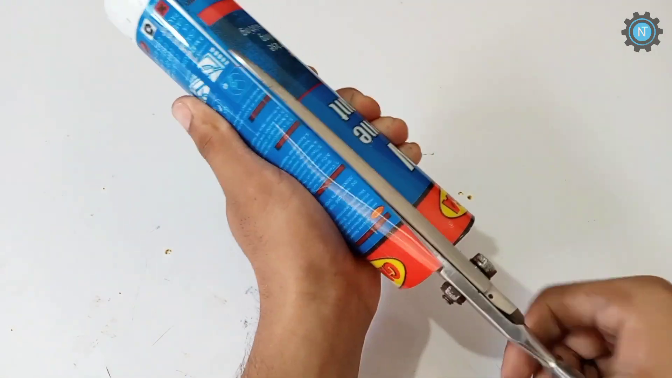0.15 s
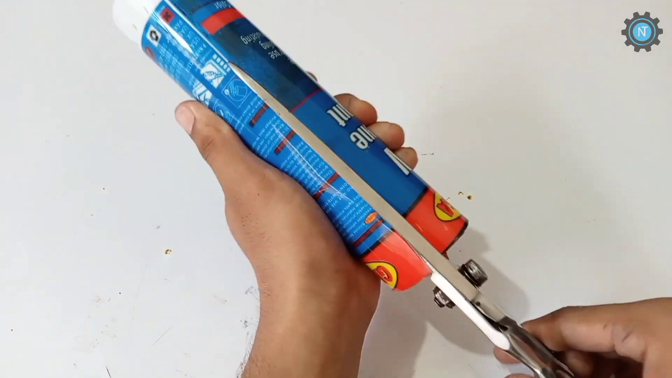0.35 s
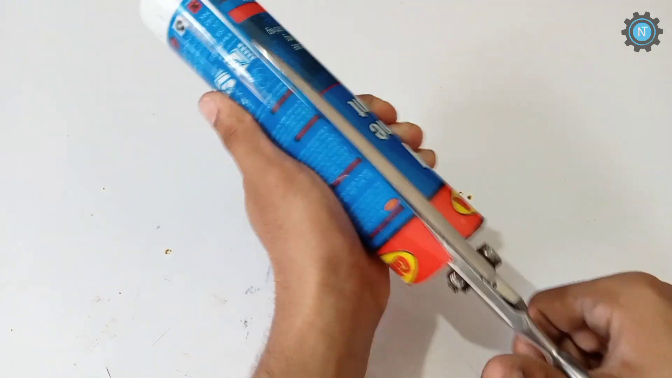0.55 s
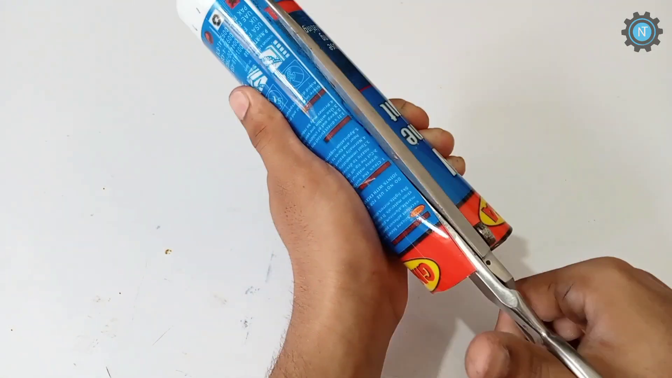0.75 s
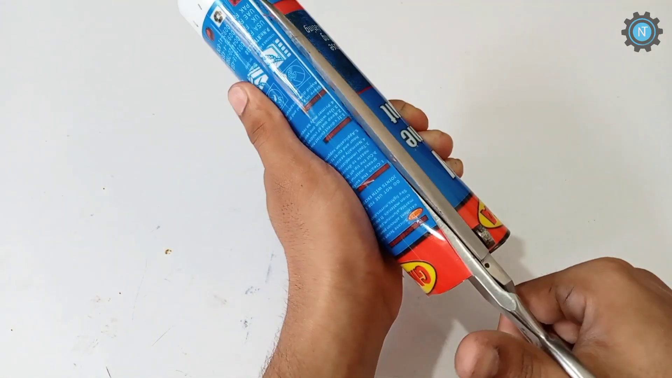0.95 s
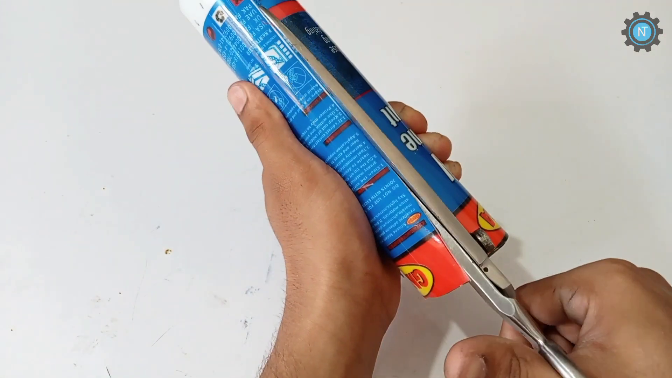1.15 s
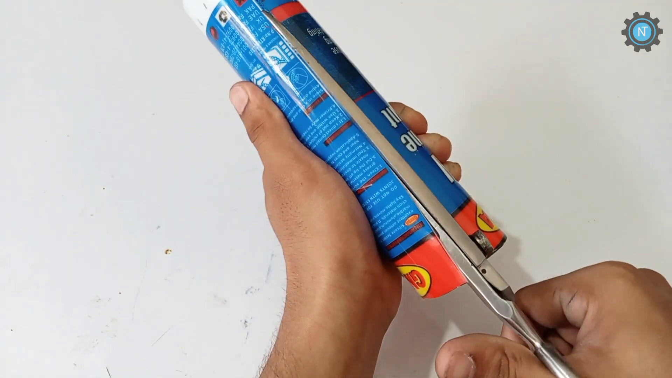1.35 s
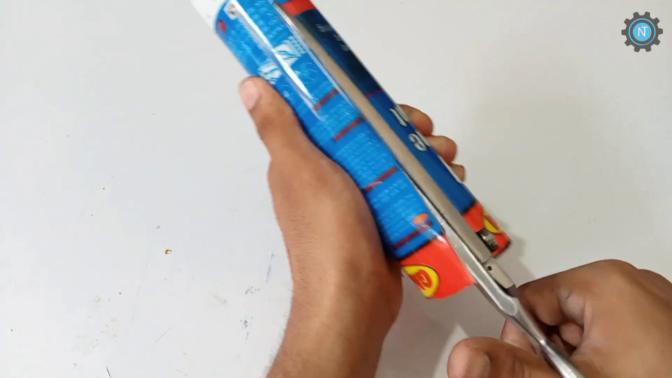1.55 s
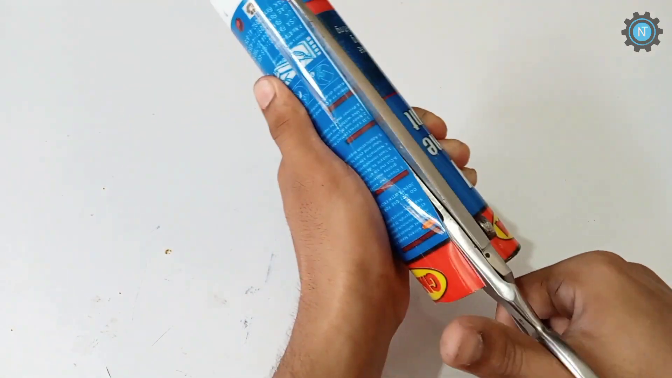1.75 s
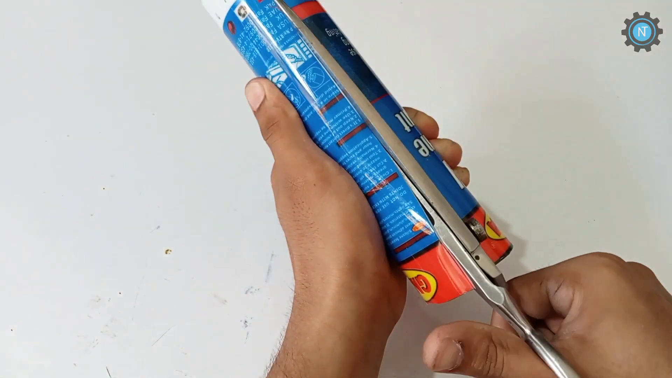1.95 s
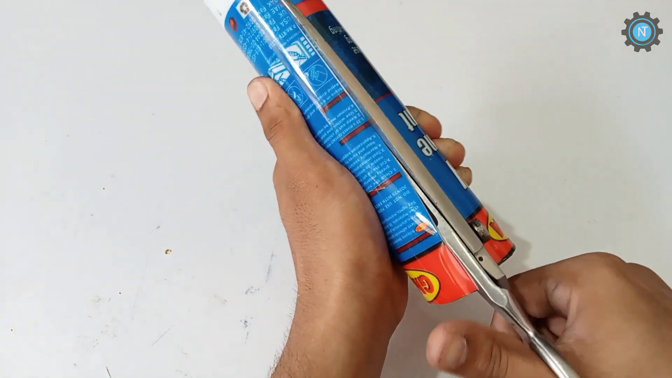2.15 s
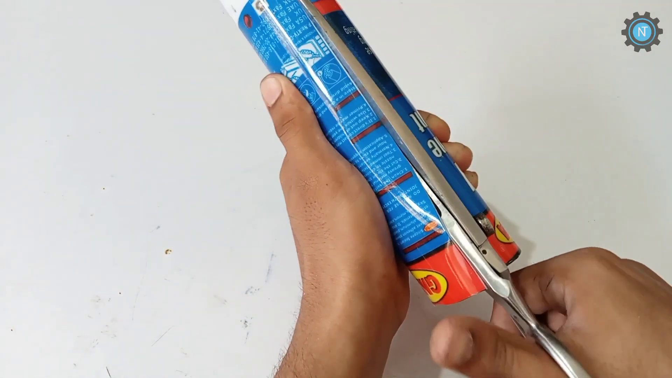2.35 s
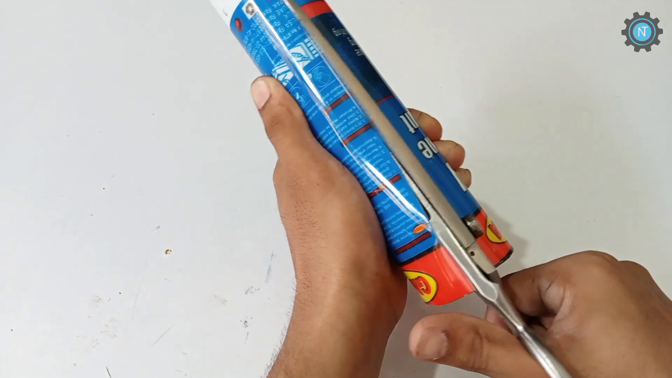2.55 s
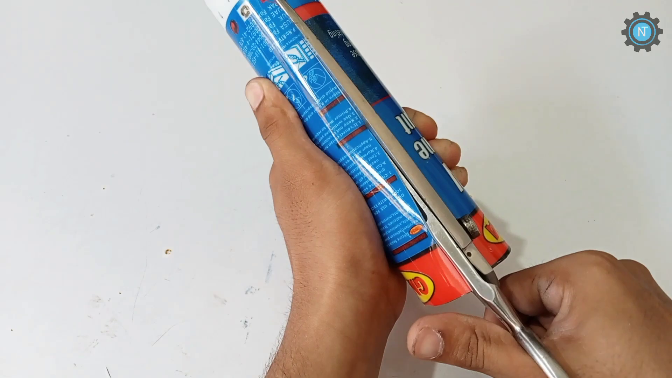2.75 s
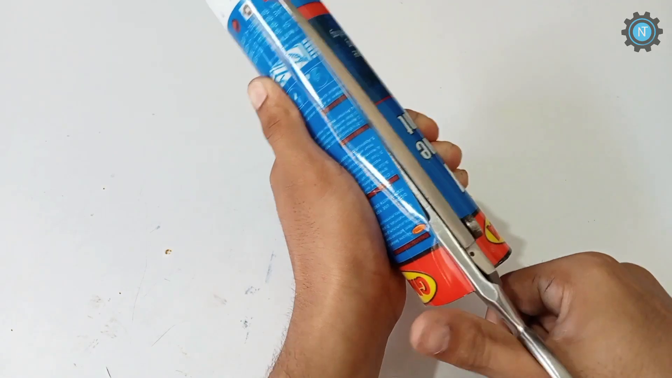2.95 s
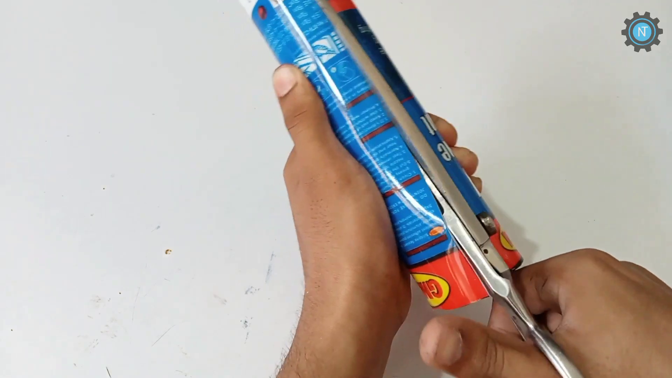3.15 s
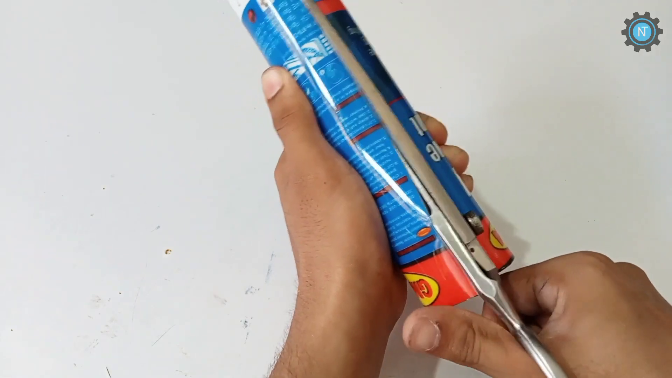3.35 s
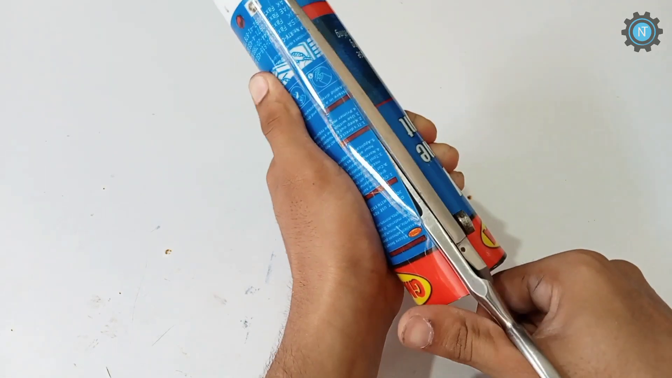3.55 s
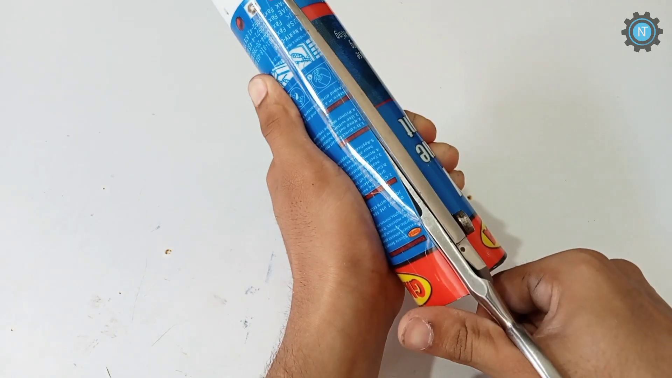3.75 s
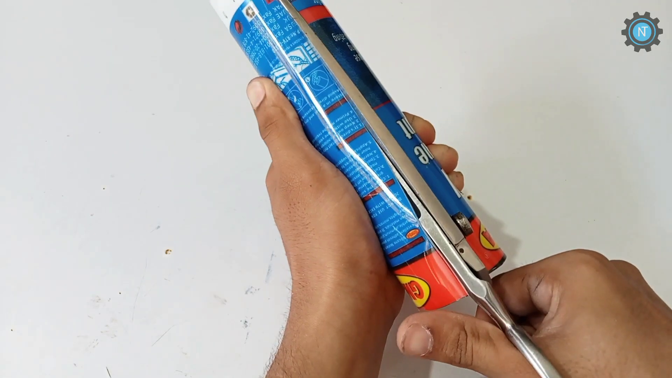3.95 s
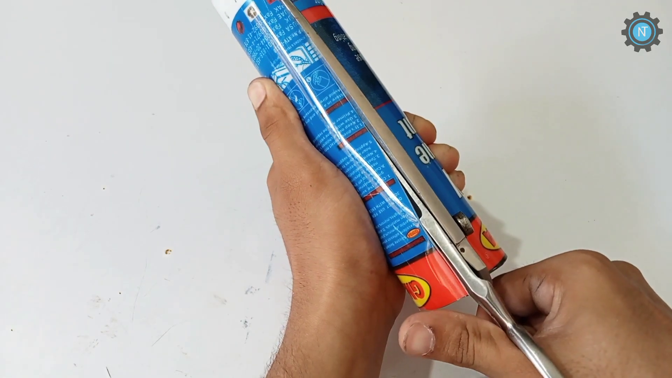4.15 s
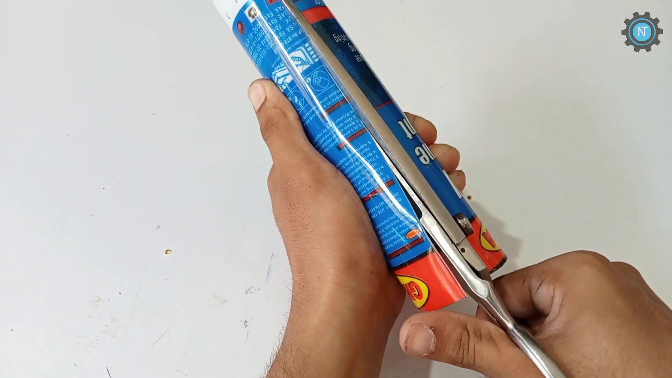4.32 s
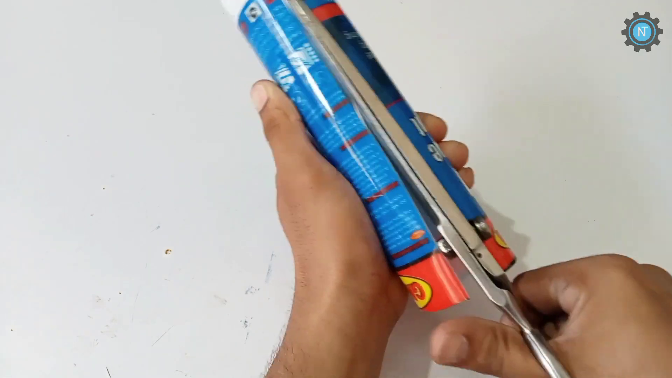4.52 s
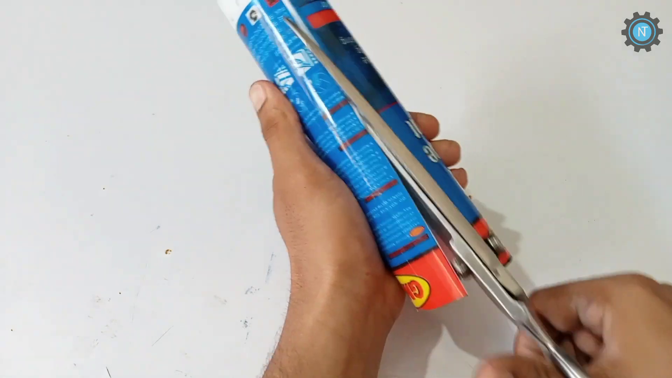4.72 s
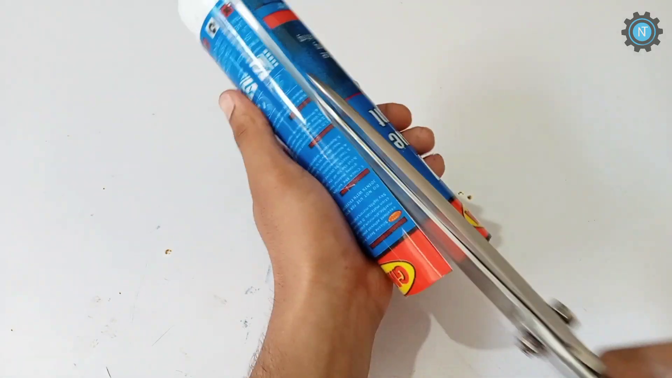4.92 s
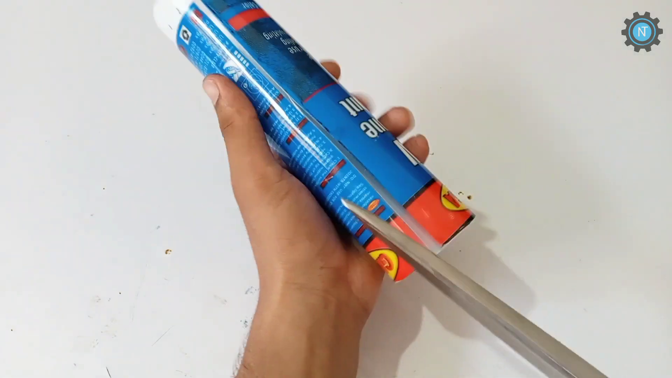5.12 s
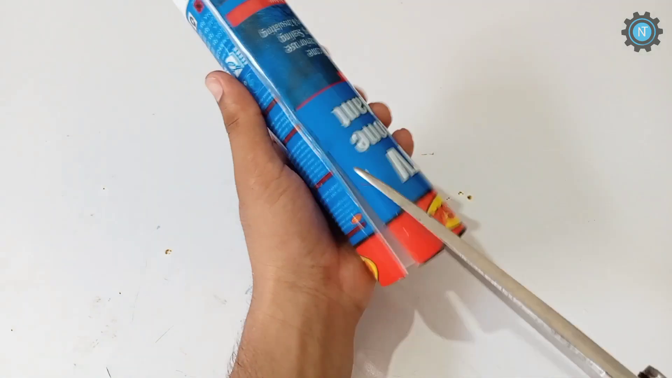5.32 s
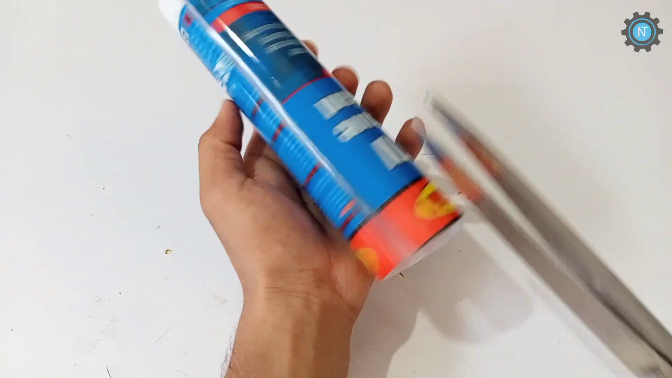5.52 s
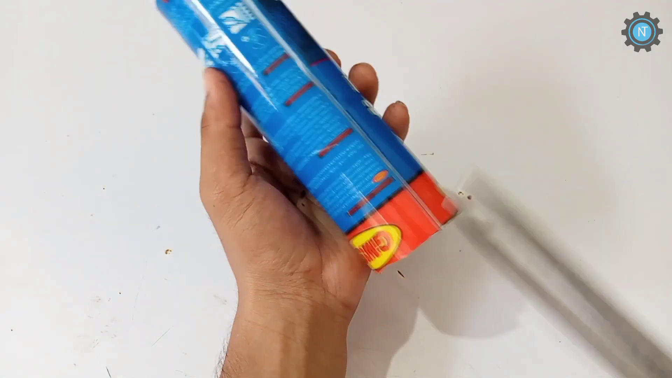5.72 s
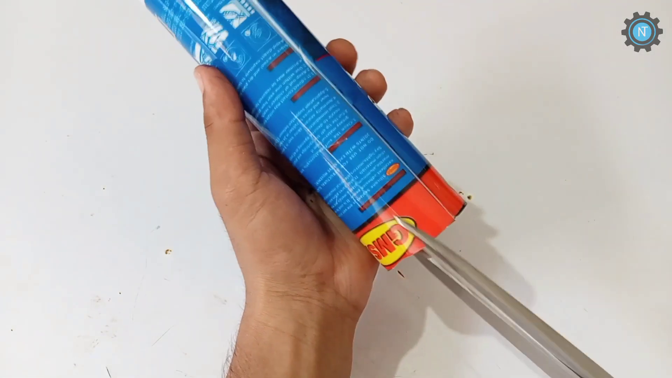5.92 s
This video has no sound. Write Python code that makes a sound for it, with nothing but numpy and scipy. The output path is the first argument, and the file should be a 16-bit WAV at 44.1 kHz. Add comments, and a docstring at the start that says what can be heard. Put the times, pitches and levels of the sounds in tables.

```python
"""Steel scissors work lengthwise through a plastic sealant cartridge, close by in a small room.
The blades clash, then tick and rasp under load until the wall gives with one loud snap; they scrape
back out of the slit and knock on the hollow tube. Blows are noise bursts and decaying modes, friction
is random clicks through filters and modes. Rubs, swishes, whistles, room noise and mains hum lie low."""
import sys
import numpy as np
from scipy import signal
from scipy.io import wavfile

SR = 44100
rng = np.random.default_rng(int(sys.argv[2]) if len(sys.argv) > 2 else 0)


def master(y):
    """Save y as 16-bit WAV."""
    cut = np.clip(np.atleast_2d(y).T, -1, 1)
    pcm = np.round(cut * 32767)  # scale
    wavfile.write(sys.argv[1], SR, pcm.astype(np.int16))


N = 263718
TIME_S = np.arange(N) / SR
BLOW_S = TIME_S[:SR // 2]

# grip on the tube shifting: t/s, length/s, level/dB, centre f/Hz
RUBS = [(-0.03, 0.12, -47.5, 278.2), (-0.04, 0.16, -53.5, 644), (0.335, 0.043, -53, 1710),
        (0.415, 0.036, -52.5, 1468), (1.856, 0.24, -53, 197.5), (2.24, 0.27, -68, 479),
        (4.829, 0.047, -40.5, 320.3), (5.02, 0.07, -48, 364), (5.482, 0.17, -56, 441),
        (5.491, 0.13, -59, 900)]
# blades closing hard: t/s, crack level/dB, crack t60/s, jammed ring/dB, free ring/dB, thump/dB
SNAPS = [(0.0, -21, 0.11, -33.5, -22.5, -55.5), (1.986, -32.5, 0.055, -64, -45, -51),
         (4.4517, -17.5, 0.016, -19, -47, -23), (4.4559, -35.5, 0.043, -18.5, -40.5, -35)]
# modes of the open blades: f/Hz, relative level/dB, t60/s
FREE_BLADE_MODES = [(2805, -14, .2), (4656, -3, .21), (4740, -8, .12), (6583, -2, .22), (6855, -1, .21),
                    (6925, -3, .2), (8301, -9, .28), (10040, -4, .14), (10110, -5, .2), (10438, -1, .19),
                    (12150, -4, .15), (12740, -6, .14), (14230, -7, .16), (15170, -4, .13)]
# modes of the blades jammed in the slit: f/Hz, relative level/dB, t60/s
JAMMED_BLADE_MODES = [(890, -1, .025), (1090, -4, .025), (1740, -7, .025), (2600, -8, .014),
                      (3350, -4, .025), (4280, -5, .02), (4650, -9, .025), (5480, -9, .018),
                      (7050, -5, .02), (8300, -8, .018), (8850, -1, .016), (9750, 2, .016),
                      (10030, 5, .013), (11220, 1, .016), (12150, -8, .018), (14700, 1, .009)]
# spectrum of snap cracks and blade scrape: f/Hz, relative level/dB
SCRAPE_SPECTRUM = [(88, -69.5), (150, -38.5), (189, -26.5), (296, -12), (490, -9.5), (1000, -7),
                   (1420, -7.5), (1800, -3.5), (2810, -4), (4560, -5.5), (7710, -6.5), (9730, -4.5),
                   (15500, -24)]
# spectrum of the room noise: f/Hz, relative level/dB
AIR_SPECTRUM = [(15, -70), (25, -41.5), (101, 3.5), (126, -11), (209, -8.5), (233, -19), (305, -14),
                (331, -15.5), (703, -27), (997, -30.5), (1750, -41.5), (3930, -36.5), (7300, -41.5),
                (13900, -53), (15500, -51)]
# course of the faint hiss: t/s, relative level/dB
HISS_SWELL = [(0, -58), (0.9, -59.5), (2.3, -56), (2.9, -61.5), (4.3, -65), (5.98, -62.5)]
# spectrum of the hiss: f/Hz, relative level/dB
HISS_SPECTRUM = [(400, 2), (800, 2.5), (1300, 0), (1750, 4), (2100, -1), (3000, -6), (5500, -12),
                 (7500, -22.5), (9500, -14), (15000, -33)]
# mains hum partials: f/Hz, mean level/dB
HUM_PARTIALS = [(100, -62.5), (200, -73), (301, -65.5)]
# wall yielding under the blades: t/s, relative level/dB, treble tilt/(dB per octave)
TICKS = [(0.275, -47.5, 14), (0.5896, -45, -14), (1.1804, -42.5, 0), (1.2045, -48, -5), (1.2352, -29, 7.5),
         (1.294, -27, 1), (1.479, -42, -9), (1.6415, -44, -4), (1.96, -26, 5), (1.9804, -35, 19),
         (1.9841, -22, -13.5), (2.3, -41.5, -2), (2.6443, -38, 5), (2.6989, -43, 2), (2.7892, -47.5, -15),
         (2.9386, -49, -4), (3.1117, -35.5, 4.5), (3.1287, -37.5, 8), (4.018, -46.5, 3), (4.0714, -42.5, 2),
         (4.657, -27.5, 9), (5.3109, -43, 3)]
# spectrum of a tick before tilt: f/Hz, relative level/dB
TICK_SPECTRUM = [(40, -45), (300, -43), (900, -34), (1700, -1.5), (2500, 2.5), (3200, 2.5), (4100, 3),
                 (5000, 4.5), (6000, 4.5), (7500, -3.5), (9500, 0), (11200, -6), (13200, -6), (14200, -34),
                 (15500, -19)]
# modes of the pivot under load: f/Hz, relative level/dB, t60/s
PIVOT_MODES = [(3900, -5, .012), (5950, -2, .014), (6350, -3, .014), (8900, -3, .014), (11200, -1, .012),
               (12400, -3, .008), (13650, 0, .01)]
# edges creeping: t/s, length/s, starting level/dB, change over the push/dB, relative pivot ring/dB
RASPS = [(0.338, 0.02, -63, 10.5, -12), (0.427, 0.017, -61.5, 1, -8), (0.511, 0.025, -71, 8, -4),
         (0.63, 0.03, -57.5, -5, -19), (0.667, 0.1, -44.5, -11.5, -14), (1.095, 0.18, -71, 17, -5),
         (1.26, 0.028, -59, 9, -4), (1.285, 0.013, -45, 5, 2), (1.335, 0.13, -58, -1.5, -27),
         (1.641, 0.085, -52.5, -1.5, -9), (1.944, 0.037, -51.5, 16, -10), (2.309, 0.036, -52, -3, -24),
         (2.586, 0.011, -62.5, 1, -13), (2.631, 0.03, -57, 3.5, -3), (3.149, 0.098, -83, 20, -23),
         (3.747, 0.094, -66.5, -8, -12), (3.997, 0.084, -70.5, 3, 4.5)]
# spectrum of the rasping plastic: f/Hz, relative level/dB
RASP_SPECTRUM = [(40, -37), (300, 4.5), (600, -7), (850, 4.5), (1200, -6), (1800, -1.5), (2400, -4.5),
                 (4000, 0), (4900, -5.5), (9600, -5.5), (12000, -21), (15500, -22)]
# narrow swishes: t/s, starting centre f/Hz, level/dB
SWISHES = [(1.248, 2074, -45.5), (3.381, 2620, -57), (3.682, 2096, -66.5)]
# blades striking the tube, and the room's reflections of the 5.39 s clack (rows 5.407 and 5.42):
# t/s, contact or build-up/s, tube ring/dB, crack level/dB, crack cut-off f/Hz, ping f/Hz
KNOCKS = [(1.3045, 0.0008, -37, -38.5, 2930, 1870), (1.9702, 0.001, -69, -37, 1970, 1670),
          (4.749, 0.0015, -33.5, -40, 5980, 1720), (4.759, 0.0065, -44, -39, 5040, 1710),
          (4.777, 0.0023, -38, -43, 4000, 1820), (4.808, 0.003, -34.5, -40.5, 3000, 1620),
          (4.8312, 0.0012, -32, -35, 6000, 1470), (4.8959, 0.002, -21, -30, 6400, 4080),
          (4.9415, 0.00081, -36, -26.5, 3560, 2750), (4.96, 0.0034, -35, -41, 3020, 1860),
          (5.084, 0.0033, -31.5, -44.5, 4030, 6420), (5.3905, 0.00024, -28, -22, 17920, 2625),
          (5.407, 0.00063, -33, -38, 12000, 1223), (5.42, 0.0027, -40, -40, 4000, 1310),
          (5.8041, 0.0013, -53, -43, 10160, 2670)]
# modes of the hollow tube: f/Hz, relative level/dB, t60/s
TUBE_MODES = [(880, -5, .03), (1085, 0, .034), (1170, -3, .025), (1290, -5, .03), (1725, -7, .028),
              (2540, -14, .022), (4050, -22, .015)]
# spectrum of a knock's crack: f/Hz, relative level/dB
CRACK_SPECTRUM = [(40, -40), (200, -27), (700, 4), (1400, 0.5), (2100, -0.5), (2700, 3), (3300, -5.5),
                  (4000, -2.5), (4700, -4.5), (6100, 1), (7000, -2), (8500, 1.5), (10000, -4.5),
                  (12000, -14.5), (15500, -9.5)]
# thin whistles: t/s, length/s, starting f/Hz, glide/Hz, mean level/dB
WHISTLES = [(2.16, 0.076, 4400, 28, -77), (2.166, 0.073, 2170, 25, -67), (2.48, .2, 4300, 30, -74),
            (2.491, 0.34, 3750, 57, -70), (5.833, 0.12, 4590, -13.5, -58.5)]
# blades sliding in the slit: t/s, length/s, edge scrape/dB, tube judder/dB, change over the stroke/dB
SLIDES = [(4.436, 0.013, -42.5, -51, 20.5), (4.482, 0.2, -35, -45, -13), (4.731, 0.06, -46.5, -42, -0.5),
          (4.835, 0.038, -36.5, -42, -11.5), (4.873, 0.035, -47.5, -36, -2.5),
          (4.958, 0.11, -50.5, -47.5, -0.5), (5.077, 0.026, -59, -35, 4), (5.093, 0.26, -62.5, -65, -18)]
# decay of the room: f/Hz, t60/s
ROOM_DECAY = [(150, .25), (1300, .2), (3500, .21), (9000, .19), (15000, .15)]
# table top and walls: delay/s, level/dB
ECHOES = [(.0034, -22), (0.0122, -20), (.0275, -22.5), (0.0325, -26), (0.0391, -36.5)]

AIR_DB = -57.5
TICK_T60_S = .027
RASP_RISE_S, RASP_RELEASE_S = 0.0048, 0.0055
SWISH_PEAK_S, SWISH_SAG_OCTAVES_PER_S2 = 0.089, 2.4
PING_T60_S = .026
PING_DB, PUSH_DB = -8.5, -19  # relative to the crack; ping at 1 ms contact
PING_DB_PER_OCTAVE = 5.4  # each doubling of the contact time favours the ping
WHISTLE_RISE_S, WHISTLE_RELEASE_S = 0.0079, 0.0083
SLIDE_RISE_S, SLIDE_RELEASE_S = 0.015, 0.0023
GRIP_DETUNE = .025  # rms share by which the grip shifts the tube's modes from stroke to stroke
BAND_EDGE_HZ = 15850


def amp(db):
    """Decibels to gain."""
    return 10 ** (np.asarray(db) / 20)


def evened(x):
    """Scales to rms 1."""
    return x / np.sqrt(np.mean(x ** 2) + 1e-20)


def struck(x, size=256):
    """Scales a blow so that its energy equals rms 1 over `size` samples."""
    return x / np.sqrt(np.sum(x ** 2) / size + 1e-20)


def read(points, hz):
    """Reads a spectrum on a log-frequency axis."""
    f, value = np.transpose(points)
    return np.interp(np.log(hz + 1), np.log(f + 1), value)


def add(mix, start_s, sound):
    """Mixes a sound in at start_s."""
    part = mix[max(round(start_s * SR), 0):][:len(sound)]
    part += sound[:len(part)]


def coloured(x, points, tilt_db=0, cut_hz=SR, size=4096):
    """Minimum-phase filter from a spectrum, with a treble tilt and a soft upper cut-off."""
    hz = abs(np.fft.fftfreq(size, 1 / SR))
    tilted_db = read(points, hz) + tilt_db * np.log2(1 + hz / 2000)  # full slope well above 2 kHz
    gain = amp(tilted_db) / np.sqrt(1 + (hz / cut_hz) ** 6)
    log_gain = np.log(np.maximum(gain, 1e-5))
    taps = np.fft.ifft(np.exp(np.conj(signal.hilbert(log_gain)))).real
    return signal.oaconvolve(x, taps[:size // 2])[:len(x)]


def dying(t60_s):
    """Exponential decay by 60 dB in t60_s, at least 1 ms."""
    return np.exp(-np.log(1000) * BLOW_S / max(t60_s, 1e-3))


def burst(t60_s):
    """Dying noise: a cluster of tiny fractures."""
    return rng.standard_normal(len(BLOW_S)) * dying(t60_s)


def ring(modes, detune=0.):
    """One blow on a set of decaying modes, each randomly shifted by the share detune."""
    out = np.zeros(len(BLOW_S))
    for hz, db, t60_s in modes:
        shifted_hz = hz * (1 + detune * rng.normal())
        out += amp(db) * dying(t60_s) * np.sin(2 * np.pi * (shifted_hz * BLOW_S + rng.random()))
    return struck(out)


def wander(per_s):
    """Random curve of rms 1 with per_s knots a second."""
    knots = rng.standard_normal(N // 20)
    return evened(np.interp(TIME_S * per_s, np.arange(len(knots)), knots))


def friction(per_s, spread_db, clump_db):
    """Stick and slip: tiny clicks of uneven size whose strength comes in clumps."""
    slips = (rng.random(N) < per_s / SR) * rng.choice([-1, 1], N)
    size_db = spread_db * np.minimum(rng.exponential(1, N), 4)
    return slips * amp(size_db + clump_db * wander(130))


def level(rows):
    """Gain curve from (t/s, level/dB) rows, silent outside them."""
    s, db = np.transpose(rows)
    return amp(np.interp(TIME_S, s, db, left=-140, right=-140))


def band(hz, width_hz):
    """Noise in one resonance that follows the curve hz."""
    r = np.exp(-np.pi * width_hz / SR)
    noise = rng.standard_normal(N) + 1j * rng.standard_normal(N)
    slow = signal.lfilter([1], [1, -2 * r, r * r], noise)
    carrier = np.exp(2j * np.pi * np.cumsum(hz * np.ones(N)) / SR)
    return evened((slow * carrier).real)


def stroke(start_s, length_s, change_db, rise_s, release_s):
    """One push of the hand: a quick rise, a hold that steadily gains or loses force, a release."""
    t = TIME_S - start_s
    rise = np.clip(t / rise_s, 0, 1)
    hold = amp(change_db * np.clip(t / length_s, 0, 1))
    return rise * hold * np.exp(-np.clip((t - length_s) / release_s, 0, 20))


def rubs(spread=0.73):
    """Skin on plastic: broad noise bands in soft half-sine swells."""
    out = np.zeros(N)
    for start_s, length_s, db, hz in RUBS:
        swell = np.sin(np.pi * np.clip((TIME_S - start_s) / length_s, 0, 1))
        out += amp(db) * swell * band(hz, spread * hz)
    return out


def snaps(tilt_db=2.0, rise_s=0.00028):
    """The blades jump shut: a crack runs through the plastic and the steel rings."""
    out = np.zeros(N)
    onset = 1 - np.exp(-(BLOW_S / rise_s) ** 2)
    for start_s, crack_db, t60_s, jammed_db, free_db, _ in SNAPS:
        crack = struck(coloured(burst(t60_s) * onset, SCRAPE_SPECTRUM, tilt_db))
        jammed = struck(onset * ring(JAMMED_BLADE_MODES, detune=0.0019))
        free = onset * ring(FREE_BLADE_MODES)
        add(out, start_s, amp(crack_db) * crack + amp(jammed_db) * jammed + amp(free_db) * free)
    return out


def thumps(thump_hz=115, thump_t60_s=0.015, rise_t60_s=.004):
    """Each snap jolts the hands and the table: a low decaying cosine."""
    out = np.zeros(N)
    envelope = dying(thump_t60_s) * (1 - dying(rise_t60_s))
    thump = struck(np.cos(2 * np.pi * thump_hz * BLOW_S) * envelope)
    for k, (start_s, *_, thump_db) in enumerate(SNAPS):
        add(out, start_s, (-1) ** k * amp(thump_db) * thump)  # push and recoil alternate
    return out


def background(hiss_db=-3, flutter_db=2, drift_rad=0.31):
    """Low room noise, a faint hiss that swells and sinks, and a wavering mains hum."""
    air = evened(coloured(rng.standard_normal(N), AIR_SPECTRUM))
    air = amp(AIR_DB) * air * amp(wander(8.5))
    hiss = evened(coloured(rng.standard_normal(N), HISS_SPECTRUM))
    hiss = amp(hiss_db) * level(HISS_SWELL) * hiss
    hum = np.zeros(N)
    for hz, db in HUM_PARTIALS:
        gain = amp(db + flutter_db * wander(37))
        hum += gain * np.sin(2 * np.pi * hz * TIME_S + drift_rad * wander(42))
    return air + hiss + np.sqrt(2) * hum


def ticks(gain_db=-12, pivot_db=-6, rise_t60_s=.001):
    """The loaded wall gives way in small bright steps that ping the pivot."""
    out = np.zeros(N)
    for start_s, db, tilt_db in TICKS:
        fractures = burst(TICK_T60_S) * (1 - dying(rise_t60_s))
        step = struck(coloured(fractures, TICK_SPECTRUM, tilt_db))
        ping = amp(pivot_db) * ring(PIVOT_MODES, detune=0.0097)
        add(out, start_s, amp(db + gain_db) * (step + ping))
    return out


def rasps(clump_db=2.0, catches_per_s=700):
    """Fine friction while the edges creep forward; sparser catches set the loaded pivot ringing."""
    plastic = evened(coloured(friction(5000, 5.4, clump_db), RASP_SPECTRUM))
    catches = friction(catches_per_s, 1.3, 2.1)
    pivot = evened(signal.oaconvolve(catches, ring(PIVOT_MODES))[:N])
    out = np.zeros(N)
    for start_s, length_s, db, change_db, pivot_db in RASPS:
        push = stroke(start_s, length_s, change_db, RASP_RISE_S, RASP_RELEASE_S)
        out += amp(db) * push * (plastic + amp(pivot_db) * pivot)
    return out


def swishes(width_hz=430, sharpness=1.58):
    """Fuzzy noise bands that swell, then fade, sinking ever faster in pitch."""
    out = np.zeros(N)
    for start_s, hz, db in SWISHES:
        t = np.maximum(TIME_S - start_s, 0)
        swell = (t / SWISH_PEAK_S * np.exp(1 - t / SWISH_PEAK_S)) ** sharpness
        sinking_hz = hz * 2 ** (-SWISH_SAG_OCTAVES_PER_S2 * t ** 2)
        out += amp(db) * swell * band(sinking_hz, width_hz)
    return out


def knocks(crack_t60_s=0.037, push_hz=330, push_t60_s=0.042):
    """Blows on the tube and two reflections of one: a crack, a tube ring, a blade ping, a low push."""
    out = np.zeros(N)
    push = struck(np.sin(2 * np.pi * push_hz * BLOW_S) * dying(push_t60_s))
    for start_s, contact_s, tube_db, crack_db, cut_hz, ping_hz in KNOCKS:
        fractures = burst(crack_t60_s) + 0.72 * burst(0.003)
        crack = struck(coloured(fractures, CRACK_SPECTRUM, cut_hz=cut_hz))
        octaves = np.log2(contact_s / .001)
        ping = amp(PING_DB + PING_DB_PER_OCTAVE * octaves) * ring([(ping_hz, 0, PING_T60_S)])
        tube = amp(tube_db) * ring(TUBE_MODES, detune=0.0072)
        blow = tube + amp(crack_db) * (crack + ping + amp(PUSH_DB) * push)
        # a glancing contact builds up slowly; energy is kept
        swelling = blow * (1 - np.exp(-(BLOW_S / contact_s) ** 2))
        add(out, start_s, swelling * np.linalg.norm(blow) / np.linalg.norm(swelling))
    return out


def whistle(waver_hz=40, waver_db=2.5):
    """Thin, faint sine tones that glide and waver in pitch and level."""
    out = np.zeros(N)
    for start_s, length_s, hz, glide_hz, db in WHISTLES:
        glide = glide_hz * np.clip((TIME_S - start_s) / length_s, 0, 1)
        pitch_hz = hz + glide + waver_hz * wander(250)
        tone = np.sqrt(2) * np.sin(2 * np.pi * np.cumsum(pitch_hz) / SR)
        out += amp(db) * tone * stroke(start_s, length_s, 0, WHISTLE_RISE_S, WHISTLE_RELEASE_S)
    return out * amp(waver_db * wander(60))


def slide(steel_db=-5.5, plain_db=-2, shell_db=-6):
    """The slit pinches the moving blades: fine slips excite the steel, coarser ones the tube."""
    fine = friction(5600, 0.68, 0.81)
    steel = evened(signal.oaconvolve(fine, ring(JAMMED_BLADE_MODES))[:N])
    plain = evened(coloured(fine, SCRAPE_SPECTRUM))
    edge = amp(steel_db) * steel + amp(plain_db) * plain
    coarse = friction(1000, 1.8, 3.3)
    shell_spectrum = [(100, -17.0), (350, 7.5), (600, 5.5), (1000, 5.5), (3000, 5), (8000, -9.5)]  # Hz, dB
    shell = evened(coloured(coarse, shell_spectrum))
    out = np.zeros(N)
    for start_s, length_s, edge_db, judder_db, change_db in SLIDES:
        tube = evened(signal.oaconvolve(coarse, ring(TUBE_MODES, detune=GRIP_DETUNE))[:N])
        judder = tube + amp(shell_db) * shell
        push = stroke(start_s, length_s, change_db, SLIDE_RISE_S, SLIDE_RELEASE_S)
        out += push * (amp(edge_db) * edge + amp(judder_db) * judder)
    return out


def room(x, tail_db=-12, build_s=0.036):
    """A few early echoes and a diffuse noise tail with a frequency-dependent decay."""
    hz, t, z = signal.stft(rng.standard_normal(len(BLOW_S)), SR, nperseg=256)
    decay = amp(-60 * t / read(ROOM_DECAY, hz)[:, None])
    tail = signal.istft(z * decay, SR, nperseg=256)[1][:len(BLOW_S)]
    tail = tail * (1 - np.exp(-(BLOW_S / build_s) ** 2))
    response = amp(tail_db) * tail / np.linalg.norm(tail)
    for delay_s, db in ECHOES:
        add(response, delay_s, np.array([amp(db)]))
    return signal.oaconvolve(x, response)[:N]


def scene(side_db=-15):
    """All sources sit in the middle; only the treble of the blade sounds spreads slightly."""
    near = snaps() + ticks() + rasps() + knocks() + slide()
    # thumps stay too low and close to fill the room
    mid = near + room(near) + rubs() + thumps() + background() + swishes() + whistle()
    highpass = signal.butter(8, 5000, "high", fs=SR, output="sos")
    treble = signal.sosfilt(highpass, near)
    side = amp(side_db) * np.roll(treble, 14) * (TIME_S > .001)  # gate drops the wrapped samples
    return np.array([mid + side, mid - side])


def record(dry):
    """Softly rounds off the highest peaks, then limits the band."""
    rounded = .9 * np.tanh(dry / .9)
    lowpass = signal.firwin(301, BAND_EDGE_HZ, window=("kaiser", 9), fs=SR)
    return signal.oaconvolve(rounded, lowpass[None], "same")


dry = scene()
out = record(dry)
master(out)
```